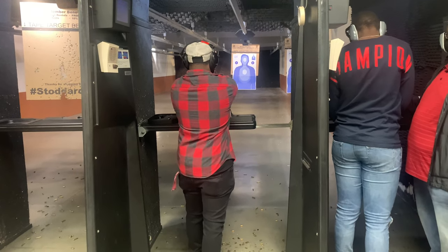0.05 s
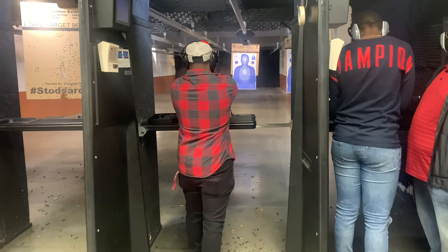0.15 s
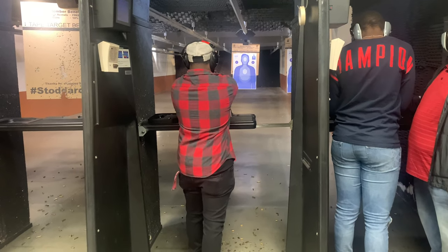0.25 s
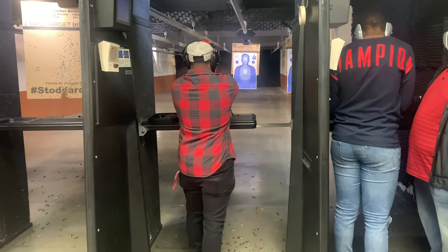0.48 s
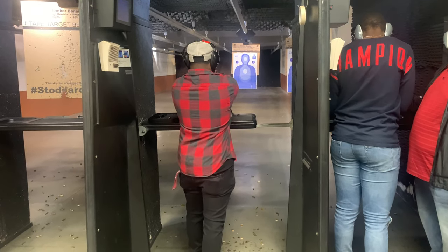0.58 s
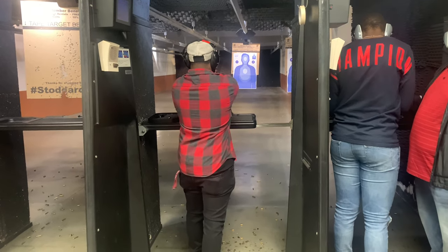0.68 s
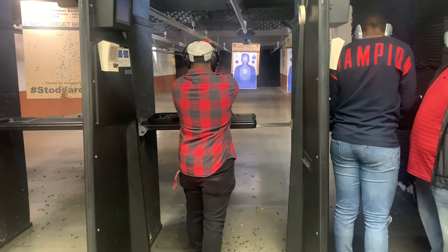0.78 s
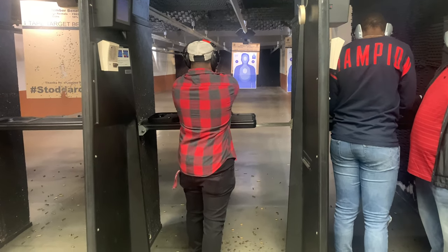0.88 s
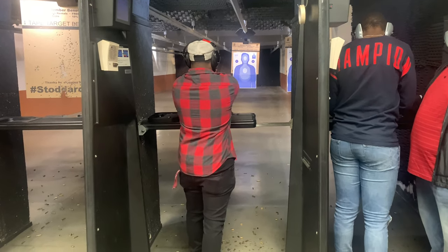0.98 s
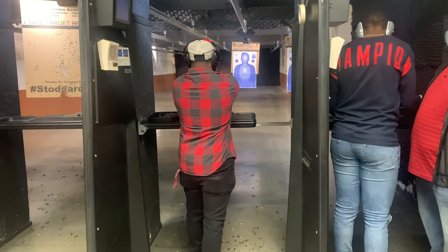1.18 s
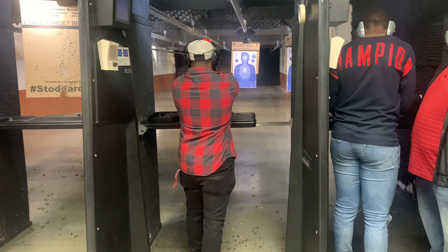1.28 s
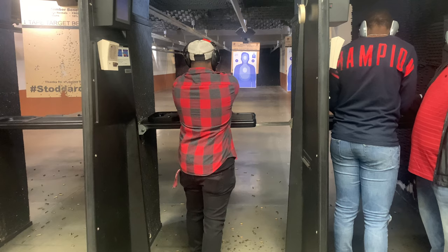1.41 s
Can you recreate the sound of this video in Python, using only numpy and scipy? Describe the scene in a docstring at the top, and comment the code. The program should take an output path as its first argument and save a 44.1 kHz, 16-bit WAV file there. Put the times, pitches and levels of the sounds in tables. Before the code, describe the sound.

A single handgun shot, heard from close behind the shooter in an indoor range, cracks sharply and rolls down the concrete hall; a faint brass case pings on the floor and bounces over low ventilation hum.

```python
"""An indoor shooting range: one handgun shot in a booth, heard from behind the shooter.
Pressure pulses make the crack; banded noise and wavering tones make the shot's dense, tinted decay.
Lumpy, decaying noise rolls down the concrete hall, returns in dull swells and lingers.
The spent case pings on the floor and bounces once, in short noise bursts and narrow ringing bands.
Ventilation hums throughout: wavering fan tones over shaped air noise."""
import sys
import numpy as np
from scipy import signal
from scipy.io import wavfile

SR = 44100
rng = np.random.default_rng(int(sys.argv[2]) if len(sys.argv) > 2 else 0)


def int16_out(signal):
    """Quantize to a 16-bit WAV file."""
    q = np.round(np.clip(np.atleast_2d(signal).T, -1, 1) * 32767)
    wavfile.write(sys.argv[1], SR, q.astype(np.int16))


N = 63945
TIME = np.arange(N) / SR
SHOT_S = 0.2084


def from_db(db):
    """Decibels to gain."""
    return 10 ** (np.asarray(db) / 20)


def rms_one(x):
    """Scale to unit rms."""
    return x / np.sqrt(np.mean(x ** 2) + 1e-20)


def at_hz(points, hz):
    """Read a table on a log-frequency axis."""
    table = np.array(points)
    return np.interp(np.log(hz), np.log(table[:, 0]), table[:, 1])


def drift(rate_hz):
    """Random wandering of rms 1, low-passed at rate_hz."""
    sos = signal.butter(2, rate_hz, fs=SR, output="sos")
    slow = signal.sosfilt(sos, rng.standard_normal(N + SR))
    return rms_one(slow[-N:])  # drop the filter's settling time


def envelope(start, attack, hold, t60):
    """Linear rise and exponential decay; hold counts from the start, all in seconds."""
    age = TIME - start
    rise = np.clip(age / attack, 0, 1)
    return rise * from_db(-60 * np.maximum(age - hold, 0) / t60)


# Left-right likeness of diffuse sound. Each row: frequency in Hz, correlation from -1 to 1.
LIKENESS = [(60, 1), (120, 0.95), (250, 0.75), (500, 0.25), (1200, -0.18), (3000, 0.18), (6000, -0.011),
            (9000, 1), (15000, 1)]
# How far left trails right. Each row: frequency in Hz, lag in seconds.
LEFT_LAGS = [(500, 0.00003), (3000, 0.00018), (9000, 0.00017), (12000, .000184), (15000, 0.00011)]


def stereo_band(low, high, order=2):
    """A stereo noise band of rms 1: shared mid and opposed side set its width; left arrives later."""
    centre = np.sqrt(low * high)
    sos = signal.butter(order, [low, min(high, SR / 2 - 100)], "band", fs=SR, output="sos")
    noise = rng.standard_normal((2, N + SR // 4))
    mid, side = signal.sosfilt(sos, noise)[:, -N:]
    alike = np.clip(at_hz(LIKENESS, centre), -.99, .99)
    mid = np.sqrt(1 + alike) * rms_one(mid)
    side = np.sqrt(1 - alike) * rms_one(side)
    left = np.interp(TIME - at_hz(LEFT_LAGS, centre), TIME, mid + side)
    return rms_one(np.array([left, mid - side]))


def steady(hz):
    """A flat envelope for every band."""
    return 1


def diffuse(spectrum, shape):
    """Noise in 28 bands, balanced by a relative spectrum, each under the envelope shape(Hz)."""
    edges = np.geomspace(22, 17000, 29)
    lows, highs = edges[:-1], edges[1:]
    centres = np.sqrt(highs * lows)
    gains = from_db(at_hz(spectrum, centres)) * np.sqrt(highs - lows)  # density to band level
    gains = gains / np.linalg.norm(gains)
    out = 0
    for gain, hz, low, high in zip(gains, centres, lows, highs):
        out = out + gain * shape(hz) * stereo_band(low, high, order=3)
    return out


def ringing(modes, start, attack, spread):
    """Clusters of close resonances, each a narrow noise band that dies away."""
    out = 0
    for hz, db, t60 in modes:
        cluster = stereo_band(hz * (1 - spread), hz * (1 + spread))
        out = out + from_db(db) * envelope(start, attack, attack, t60) * cluster
    return out


# Blast and first booth reflections. Each row: start in seconds, relative level in dB,
# pan in dB (positive is left), pulse length in seconds.
SLAPS = [(0.2111, -14, -8, .0002), (.2132, -10.5, 4.5, .0002), (0.2157, -22, 6, .00024),
         (0.226, -8.5, -8.5, .0003), (0.234, -14.5, 3, .0004), (.2458, -8, 5, .0007),
         (0.2583, -19, 2, .0006)]
PULSE_LOW_HZ, PULSE_HIGH_HZ = 249, 4000


def blast():
    """A sharp pressure pulse with suction behind it, repeated by the nearest walls."""
    out = np.zeros((2, N))
    left_lag = at_hz(LEFT_LAGS, PULSE_HIGH_HZ)
    for start, db, pan, length in SLAPS:
        for channel, (lag, side_db) in enumerate([(left_lag, pan / 2), (0, -pan / 2)]):
            age = (np.arange(N) - int((start + lag) * SR)) / SR / length  # in pulse lengths
            pulse = (age >= 0) * (1 - age) * np.exp(-np.abs(age))
            out[channel] += from_db(db + side_db) * pulse
    sos = signal.butter(2, [PULSE_LOW_HZ, PULSE_HIGH_HZ], "band", fs=SR, output="sos")
    return signal.sosfilt(sos, out) / 2


# Tone of the dense booth noise. Each row: frequency in Hz, relative density in dB per Hz.
DENSE_SPECTRUM = [(60, -17.5), (130, -14.5), (260, -7), (520, 2.5), (950, -4), (1400, 3), (2000, -5),
                  (3200, -6), (5000, -4), (7000, -9), (9000, -14), (12000, -18), (15000, -24.5)]
# Steepness of the onset. Each row: frequency in Hz, rise in dB per second.
DENSE_RISE = [(300, 1601.5), (5000, 2394), (10000, 4997.5)]
# Wait from the shot to the decay. Each row: frequency in Hz, hold in seconds.
DENSE_HOLD = [(100, 0.013), (1400, 0.02), (3000, 0.0075), (12000, 0.011)]
# Decay of the noise. Each row: frequency in Hz, time to fall 60 dB in seconds.
DENSE_T60 = [(100, 1), (500, 0.47), (1500, 0.38), (5000, 0.27), (14000, 0.24)]
DENSE_DB, DENSE_PEAK_DELAY_S = -25.5, 0.0019


def dense_noise():
    """Dense booth noise with a short, steep rise to its peak, then a decay."""
    peak_s = SHOT_S + DENSE_PEAK_DELAY_S

    def shape(hz):
        """Rise, hold and decay of one band; treble rises and decays fastest."""
        rise_db = at_hz(DENSE_RISE, hz) * np.minimum(TIME - peak_s, 0)
        decay_age = np.maximum(TIME - SHOT_S - at_hz(DENSE_HOLD, hz), 0)
        return from_db(rise_db - 60 * decay_age / at_hz(DENSE_T60, hz))

    return from_db(DENSE_DB) * diffuse(DENSE_SPECTRUM, shape)


# Wavering tones that colour the shot's decay. Each row: frequency in Hz, peak level in dB.
TINTS = [(262, -31.5), (428, -34.5), (509, -34), (545, -36), (604, -37), (714, -35), (1121, -34),
         (1149, -36), (1275, -37.5), (1336, -36), (1410, -38.5), (1484, -34), (1602, -36.5), (2072, -41),
         (2452, -35.5), (3092, -40), (3591, -45)]
# Their decay. Each row: frequency in Hz, time to fall 60 dB in seconds.
TINT_T60 = [(260, .42), (700, .36), (1400, .3), (3600, .2)]
TINT_BUILD_S, TINT_HOLD_S = 0.0048, 0.023
TINT_WAVER_HZ, TINT_WAVER_RAD, TINT_APART_RAD = 31, 0.84, 1.18


def tinting_tones():
    """Decaying tones at listed pitches, wavering in phase and out of step between channels."""
    out = 0
    for hz, db in TINTS:
        waver = TINT_WAVER_RAD * np.array([drift(TINT_WAVER_HZ), drift(TINT_WAVER_HZ)])
        apart = TINT_APART_RAD * rng.standard_normal((2, 1))
        phase = 2 * np.pi * (hz * TIME + rng.random()) + waver + apart
        fade = envelope(SHOT_S, TINT_BUILD_S, TINT_HOLD_S, at_hz(TINT_T60, hz))
        out = out + from_db(db) * np.sin(phase) * fade
    return out


# Tone of the long hall. Each row: frequency in Hz, relative density in dB per Hz.
HALL_SPECTRUM = [(50, 2), (100, 6.5), (180, 2.5), (350, 4), (600, 2.5), (1100, -4), (1800, -13.5),
                 (2600, -8.5), (3600, -16.5), (4800, -16), (8000, -24.5), (11000, -20), (15000, -38)]
# Hall decay. Each row: frequency in Hz, time to fall 60 dB in seconds.
HALL_T60 = [(60, 1), (250, 1.48), (600, 1.47), (1200, 1.374), (2500, 1.2), (5000, 0.97), (9000, 0.61),
            (15000, 0.34)]
# Swells returning from far down the range. Each row: start in seconds, level in dB.
RETURNS = [(0.358, -55), (0.433, -43), (.535, -46), (0.623, -53.5), (0.746, -57.5)]
# Tone of those swells. Each row: frequency in Hz, relative density in dB per Hz.
RETURN_SPECTRUM = [(60, -4), (100, 19), (200, 3), (500, 7), (1200, -5), (3000, -28), (15000, -69)]
# Faint reverberation lingering at the far end. Each row: frequency in Hz, relative density in dB per Hz.
LINGER_SPECTRUM = [(100, -5), (300, 2), (560, 1.5), (900, -12), (1400, -7), (2000, -15.5), (3000, -15.5),
                   (4000, -22), (6300, -29), (12000, -45)]
HALL_DB, HALL_BUILD_S = -33.5, 0.036
HALL_LUMPS_HZ, HALL_LUMPS_DB = 14, 1.5
RETURN_RISE_S, RETURN_T60_S = .022, .3
LINGER_DB, LINGER_T60_S = -60, 5.26


def hall():
    """The report rolls unevenly down the range, losing treble first, returns in swells and lingers."""
    def shape(hz):
        """Build-up and lumpy decay of one band."""
        lumps = from_db(HALL_LUMPS_DB * drift(HALL_LUMPS_HZ))
        return envelope(SHOT_S, HALL_BUILD_S, HALL_BUILD_S, at_hz(HALL_T60, hz)) * lumps

    roll = from_db(HALL_DB) * diffuse(HALL_SPECTRUM, shape)
    swells = 0
    for start, db in RETURNS:
        swells = swells + from_db(db) * envelope(start, RETURN_RISE_S, RETURN_RISE_S, RETURN_T60_S)
    linger = from_db(LINGER_DB) * envelope(SHOT_S, HALL_BUILD_S, HALL_BUILD_S, LINGER_T60_S)
    return roll + swells * diffuse(RETURN_SPECTRUM, steady) + linger * diffuse(LINGER_SPECTRUM, steady)


# The case lands, then bounces. Each row: start in seconds, ring level in dB, snap level in dB.
LANDINGS = [(0.958, -81, -70), (1.164, -97, -77)]
# Ringing modes of the brass. Each row: frequency in Hz, relative level in dB,
# time to fall 60 dB in seconds.
CASE_MODES = [(6390, 0, .3), (7600, -5, .18), (9400, -3, 0.246), (10620, -1, .38), (11500, -12, .21)]
# Tone of the clink. Each row: frequency in Hz, relative density in dB per Hz.
CLINK_SPECTRUM = [(1000, -15), (3000, 1), (6500, 8), (8500, -1), (11500, -6), (15000, -38)]
# Tone of the contact itself. Each row: frequency in Hz, relative density in dB per Hz.
SNAP_SPECTRUM = [(1000, -19), (2900, -6), (4200, -4), (6300, 14), (8000, 8), (11000, -16), (15000, -31)]
CLINK_OVER_RING_DB, CLINK_T60_S = 10.5, 0.26
SNAP_RISE_S, SNAP_T60_S = .001, .04
TICK_S, TICK_HZ, TICK_DB, TICK_T60_S = 1.165, 2950, -68, .045
TICK_SPREAD = .07  # fraction of its pitch to either side


def spent_case():
    """Brass lands on concrete: a snap, a clink and a thin ring; the bounce adds a lower tick."""
    snaps, clinks, rings = 0, 0, 0
    for start, ring_db, snap_db in LANDINGS:
        snaps = snaps + from_db(snap_db) * envelope(start, SNAP_RISE_S, SNAP_RISE_S, SNAP_T60_S)
        clink_gain = from_db(ring_db + CLINK_OVER_RING_DB)
        clinks = clinks + clink_gain * envelope(start, attack=0.0014, hold=0, t60=CLINK_T60_S)
        rings = rings + from_db(ring_db) * ringing(CASE_MODES, start, attack=0.024, spread=0.014)
    tick = ringing([(TICK_HZ, TICK_DB, TICK_T60_S)], TICK_S, SNAP_RISE_S, TICK_SPREAD)
    return snaps * diffuse(SNAP_SPECTRUM, steady) + clinks * diffuse(CLINK_SPECTRUM, steady) + rings + tick


# Fan tones. Each row: frequency in Hz, rms level in dB.
FAN = [(59, -64.5), (104, -53.5), (122.5, -57.5), (167, -56.5)]
# Tone of the duct air. Each row: frequency in Hz, relative density in dB per Hz.
AIR_SPECTRUM = [(22, -29), (35, -18), (55, 0), (72, -7.5), (100, 9.5), (150, -3), (205, -17.5),
                (400, -23.5), (560, -25.5), (900, -36), (1400, -36), (2000, -44.5), (3000, -41.5),
                (4000, -48.5), (6000, -50.5), (9000, -61), (15000, -75)]
AIR_DB = -49
FAN_WAVER_HZ, FAN_WAVER_DB, FAN_WAVER_RAD = 7.7, 3, 1


def ventilation():
    """Fan tones wavering in level and phase over duct rumble and faint hiss."""
    tones = 0
    for hz, db in FAN:
        phase = 2 * np.pi * (hz * TIME + rng.random()) + FAN_WAVER_RAD * drift(FAN_WAVER_HZ)
        swell = from_db(FAN_WAVER_DB * drift(FAN_WAVER_HZ))
        tones = tones + from_db(db) * rms_one(swell * np.sin(phase))
    return tones + from_db(AIR_DB) * diffuse(AIR_SPECTRUM, steady)


def scene():
    """All sources, leaning a little to the right."""
    shot = blast() + dense_noise() + tinting_tones() + hall()
    return (shot + spent_case() + ventilation()) * from_db([[-.4], [.4]])


CUTOFF_HZ = 15900


def record(dry):
    """A steep low-pass cuts the top."""
    sos = signal.ellip(10, .1, 80, CUTOFF_HZ, fs=SR, output="sos")  # ripple and rejection in dB
    return signal.sosfilt(sos, dry)


dry = scene()
out = record(dry)
int16_out(out)
```